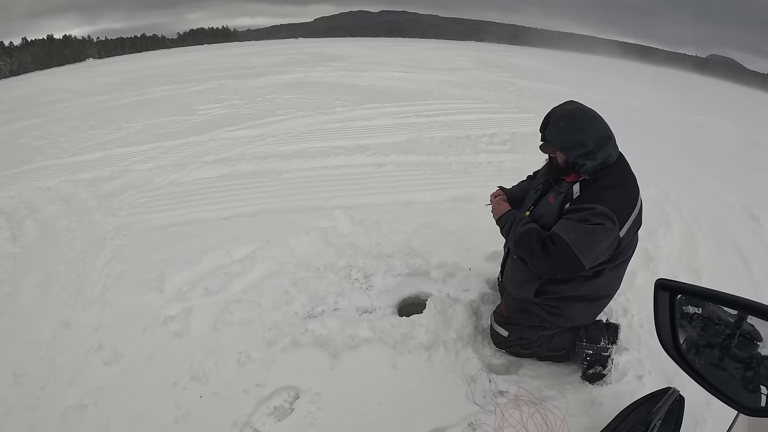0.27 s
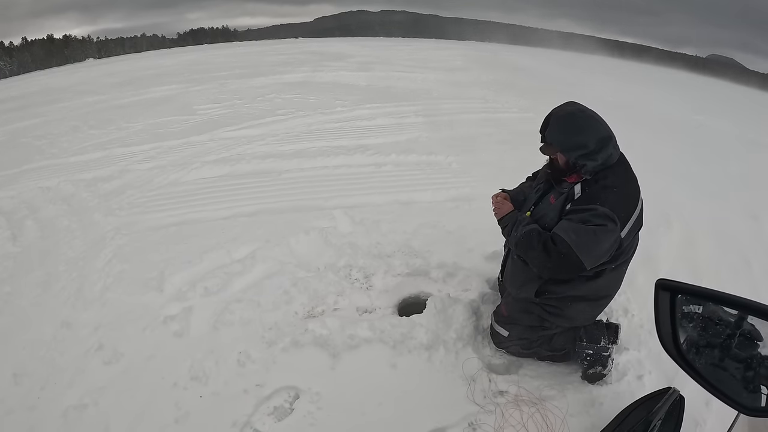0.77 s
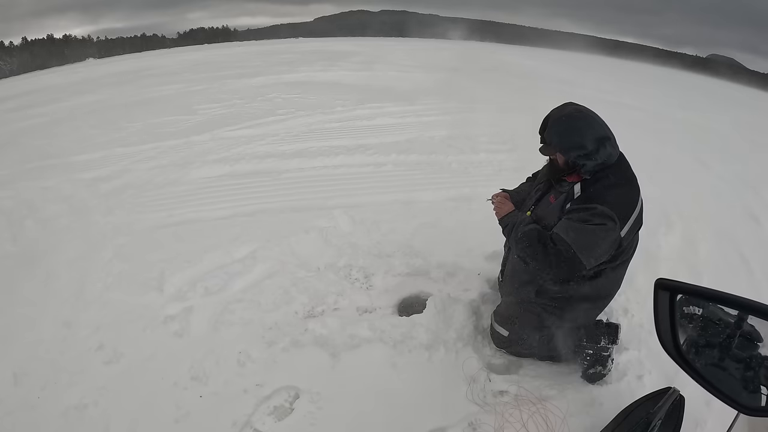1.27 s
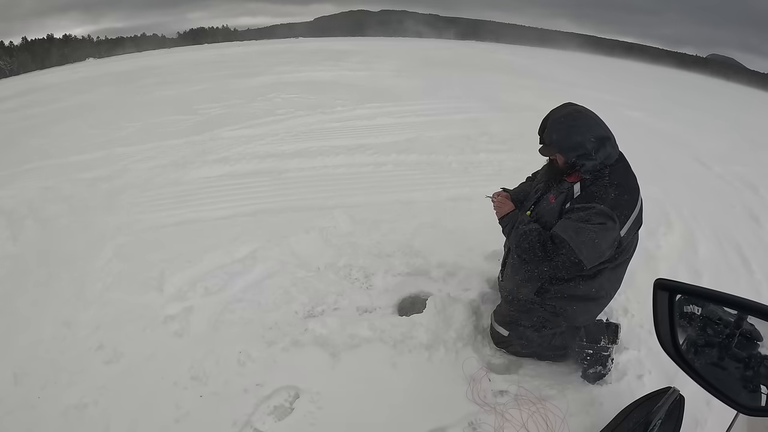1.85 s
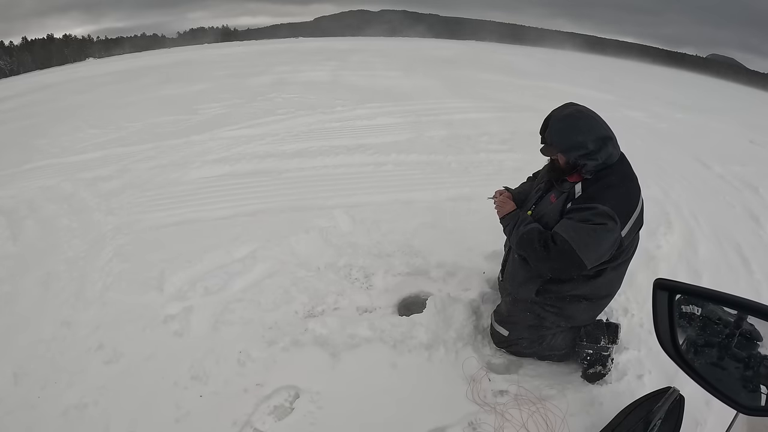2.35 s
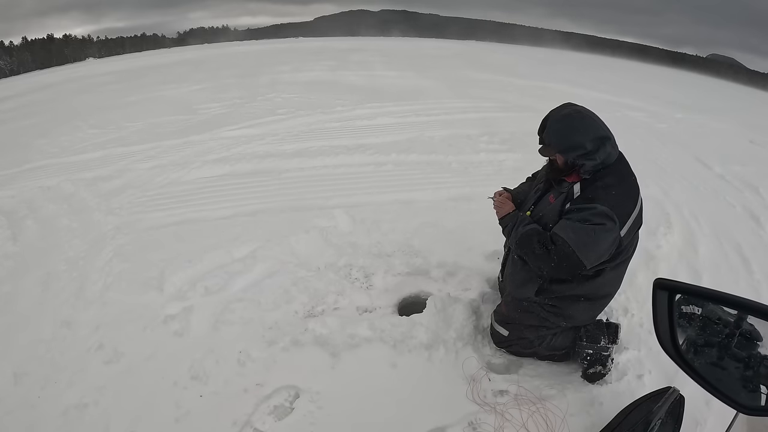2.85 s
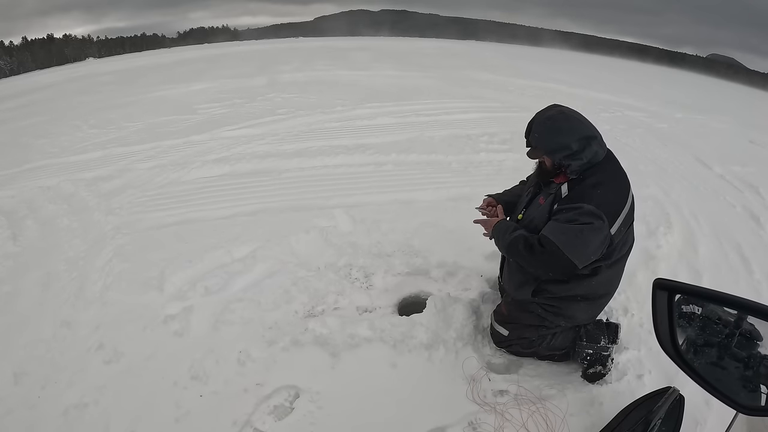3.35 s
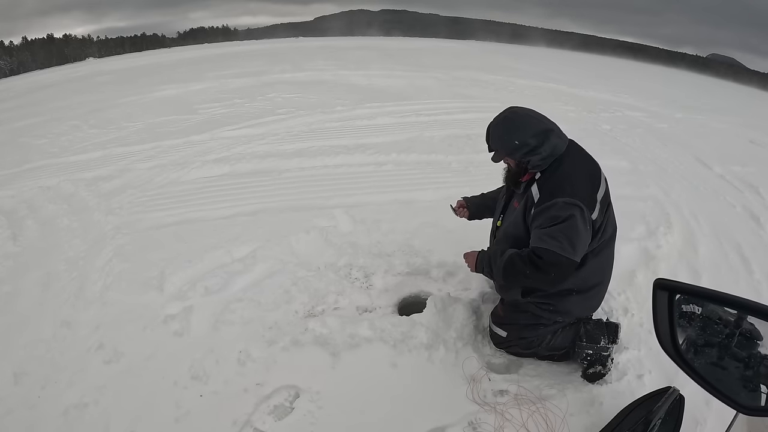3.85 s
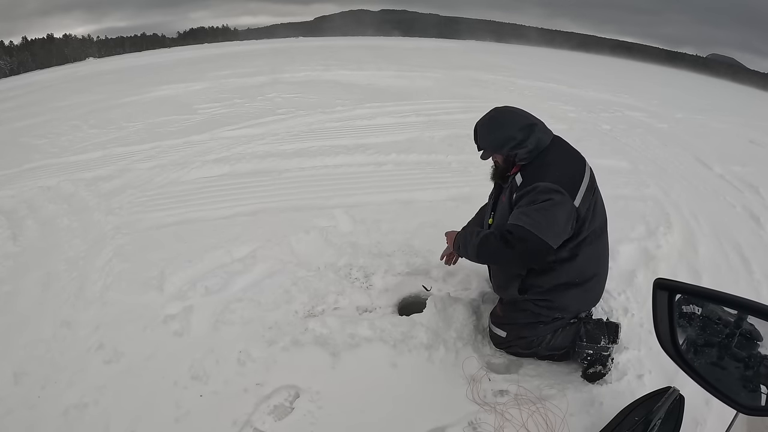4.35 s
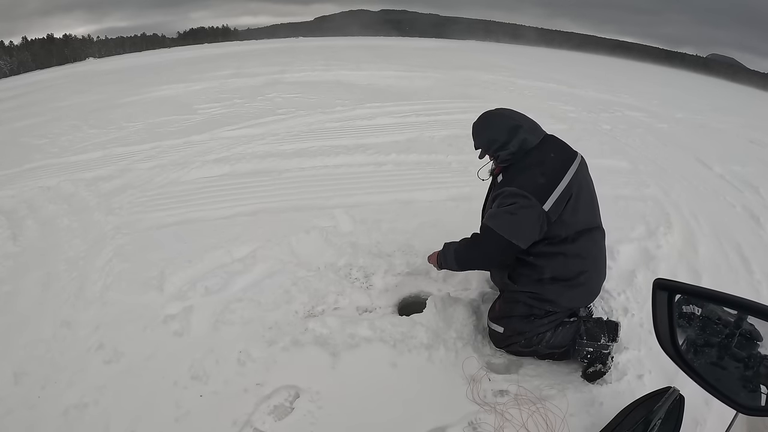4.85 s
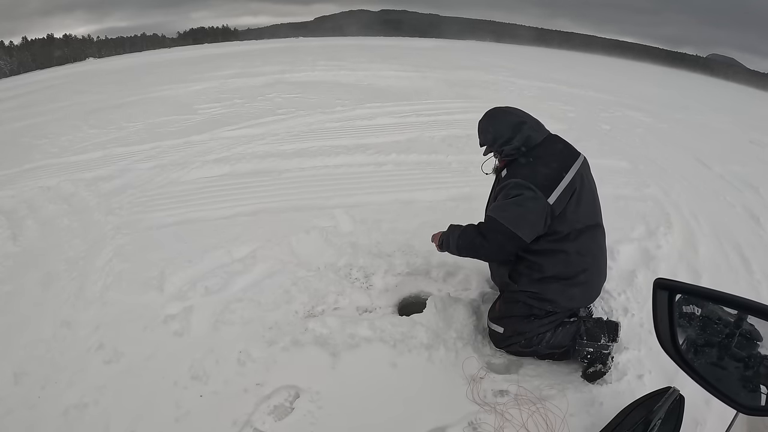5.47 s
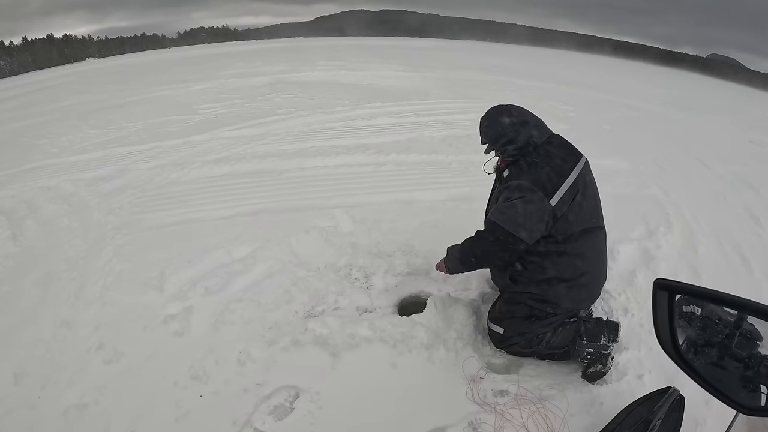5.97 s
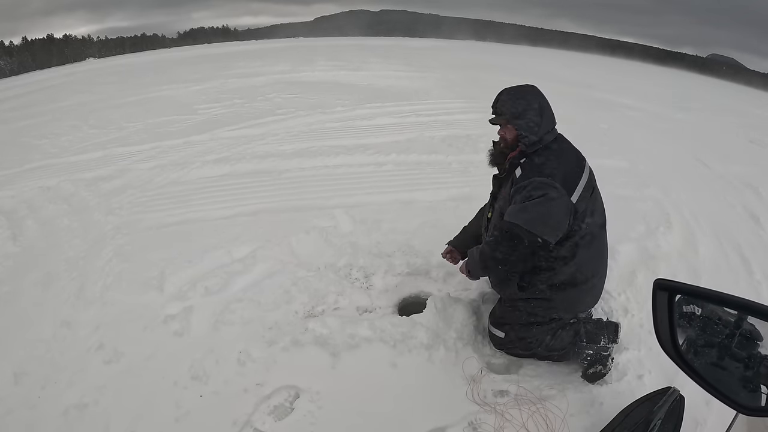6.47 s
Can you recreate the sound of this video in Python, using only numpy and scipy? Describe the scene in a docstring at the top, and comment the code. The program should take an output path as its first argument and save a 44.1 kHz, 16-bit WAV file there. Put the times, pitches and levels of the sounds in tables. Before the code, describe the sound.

A low, uneven roar of wind presses directly on the microphone out on a snowy frozen lake. It opens with the hardest, most hissing gust, settles slightly, and thumps harder again near the end. A thin sizzle of blowing snow sits above it. From about halfway, a few faint ticks like ice hitting the camera poke through, plus a very brief swish, perhaps a sleeve.

```python
"""A low, thumping roar: storm wind on a frozen lake blows straight over a small camera's microphone.
Turbulent eddies press on the port, roar round the housing and excite its hollow resonance.
Faster air adds a hiss, and the many small impacts of drifting snow merge into a fine sizzle.
A few faint ticks, likely ice grains hitting the housing, and one soft swish poke through."""
import sys
import numpy as np
from scipy import signal
from scipy.fft import rfft, irfft
from scipy.io import wavfile
from scipy.ndimage import uniform_filter1d

SR = 44100
rng = np.random.default_rng(int(sys.argv[2]) if len(sys.argv) > 2 else 0)


def store_wav(level_fs):
    """Save 16-bit WAV to argv[1]."""
    pcm = np.round(np.clip(np.atleast_2d(level_fs), -1, 1) * 32767)
    wavfile.write(sys.argv[1], SR, pcm.T.astype(np.int16))


N = 296352
TIME = np.arange(N) / SR

# The amount of drifting snow. Each row: time in seconds, relative level in dB.
DRIFT = [(0.0, -79), (0.13, -83), (0.33, -71.5), (1.05, -78), (1.32, -76), (1.8, -80), (3.2, -87.5),
         (3.9, -83.5), (5.25, -89.5), (6.08, -76), (6.72, -85)]


def wind():
    """Turbulence spans many scales: large eddies thump, smaller ones roar, the smallest hiss."""
    # Wind at the port. Each row: time in seconds, relative levels of buffeting and of roar in dB.
    port_levels = [(0.0, -29.5, -26.5), (0.45, -28, -25), (0.9, -33, -25), (1.25, -33, -27.5),
                   (1.7, -36, -28.5), (2.0, -39, -32.5), (2.35, -42.5, -30), (2.65, -33, -29.5),
                   (3.3, -35.5, -29), (3.55, -33, -29.5), (3.85, -37.5, -29), (4.25, -37.5, -31),
                   (5.345, -32.5, -29.8), (5.37, -31, -27), (5.6, -33, -28), (5.9, -30.5, -27),
                   (6.3, -34, -28.5), (6.72, -36, -31.5)]
    # The gusts. Each row: time in seconds, relative level of the rushing air in dB.
    gust_levels = [(0.0, -48.5), (0.12, -53.5), (0.16, -45.5), (0.185, -48), (0.22, -48), (0.255, -41),
                   (0.31, -43.5), (0.38, -40), (0.48, -40.5), (0.58, -43), (0.72, -42), (1.05, -46),
                   (1.37, -43), (1.55, -47.5), (1.75, -46.5), (1.97, -51), (2.35, -48.5), (2.52, -48.5),
                   (2.67, -45), (2.85, -48), (3.12, -51), (3.62, -51.5), (3.78, -48.5), (4.02, -49.5),
                   (4.17, -51.5), (4.75, -51), (5.12, -55), (5.345, -52), (5.37, -48.5), (5.52, -51),
                   (5.8, -48.5), (6.0, -49.5), (6.15, -51), (6.27, -49), (6.52, -49.5), (6.65, -52),
                   (6.72, -51.5)]
    buffet_db, flow_db = curves(port_levels)
    gust_db, = curves(gust_levels)
    eddy_thump, eddy_roar, eddy_ring, eddy_hiss = large_eddies()
    roar_drop_db, hiss_drop_db = lulls()
    lurch_hz = 22.14  # lesser eddies make the wind lurch at random
    roar_db = flow_db - roar_drop_db + 0.67 * walk(lurch_hz)
    flutter = walk(rate_hz=55)  # each passing eddy shakes all the bands together
    buffet_db = buffet_db - roar_drop_db + 1.66 * walk(lurch_hz)
    gust_db = gust_db - hiss_drop_db
    return (buffeting(add_power(buffet_db, eddy_thump), flutter)
            + roar(add_power(roar_db, eddy_roar), flutter)
            + housing_resonance(gust_db, roar_db, eddy_ring, flutter)
            + hiss(add_power(gust_db, eddy_hiss), flutter)
            + rumble(flow_db, roar_drop_db, flutter))


def buffeting(level_db, flutter):
    """Pseudo-sound: the slow pressure swings of large eddies act directly on the port."""
    # Spectrum of the buffeting. Each row: frequency in Hz, relative level in dB.
    spectrum = [(10, -28.5), (20, -10.5), (48, 1), (90, 3), (120, -3.5), (180, -9.5), (400, -74)]
    return turbulence(spectrum, 0.71 * flutter, span_s=0.067) * undb(level_db + 0.5)


def roar(level_db, flutter):
    """Flow round an obstacle: smaller eddies pass the housing faster and so sound higher."""
    # Spectrum of the roar. Each row: frequency in Hz, relative level in dB.
    spectrum = [(50, -27), (95, -5.5), (140, -0.5), (190, -1.5), (240, -1.5), (295, -2), (380, -5.5),
                (470, -13.5), (700, -43.5), (1500, -75)]
    return turbulence(spectrum, 1.54 * flutter, span_s=0.035) * undb(level_db - 0.41)


def rumble(flow_db, drop_db, flutter):
    """Nonlinear growth: above a knee, the low part of the roar rises twice as many dB as the flow."""
    # Spectrum of the rumble. Each row: frequency in Hz, relative level in dB.
    spectrum = [(60, -30), (110, -7), (165, -0.5), (215, -2), (280, -19.5), (600, -74.5)]
    knee_db = -31
    level_db = flow_db - drop_db - 11.5 + np.maximum(flow_db - knee_db, 0)
    return turbulence(spectrum, 1.2 * flutter, span_s=0.058) * undb(level_db)


def housing_resonance(gust_db, roar_db, eddy_ring, flutter):
    """Forced resonance: air speed and eddies together drive the hollow band of the housing."""
    # Response of the housing. Each row: frequency in Hz, relative level in dB.
    spectrum = [(250, -17), (440, 0.5), (485, -2.5), (520, 1.5), (620, -0.5), (740, -3), (860, -4),
                (930, -10), (1000, -13), (1250, -18.5), (1700, -32.5), (4000, -79.5)]
    gust_share = 0.65
    drive_db = gust_share * (gust_db + 15.5) + (1 - gust_share) * (roar_db - 8.0)
    return turbulence(spectrum, flutter, span_s=0.06) * undb(add_power(drive_db, eddy_ring))


def large_eddies():
    """A passing eddy is one pressure pulse; returns the gains of its thump, roar, ring and hiss."""
    # The largest eddies. Each row: time in seconds, relative peaks of thump, roar, ring and hiss in dB.
    eddies = [(0.09, -24, -45, -51, -71), (0.2, -23.5, -29, -34, -51), (0.27, -24, -35, -45, -45),
              (0.46, -22, -27, -27, -55), (0.66, -25, -32, -32, -47), (0.755, -33, -26, -30, -52),
              (0.87, -37, -35, -41, -60), (0.99, -27, -34, -45, -60), (1.08, -26, -28, -42, -45.5),
              (1.385, -33, -26, -29.5, -62), (1.73, -32, -26, -40, -62), (2.39, -46, -30, -48, -60),
              (2.694, -35, -24, -29.5, -52), (2.77, -35, -40, -31, -53), (3.459, -30, -26.5, -37, -55),
              (3.75, -46, -27, -44, -64), (3.88, -35, -29, -36, -60), (4.01, -33, -31, -36, -48),
              (4.35, -37, -27.5, -42, -65), (4.48, -28, -32, -41, -58), (4.84, -27.5, -30, -37, -67),
              (5.1, -44, -28, -47, -67), (5.265, -27.5, -30.5, -32, -57), (5.41, -38, -33, -35, -54),
              (5.6, -32, -37, -41, -50.5), (5.79, -30, -27, -39, -65), (5.88, -29, -28.5, -34, -65),
              (6.07, -40, -26.5, -37, -63), (6.24, -42, -42, -35, -47.5), (6.46, -24, -28, -36, -55)]
    rise_s, fall_s = 0.015, 0.018
    gains = np.zeros((4, N))
    for peak_s, *peaks_db in eddies:
        width_s = np.where(TIME < peak_s, rise_s, fall_s)
        gains += undb(peaks_db)[:, None] * bell(peak_s, width_s)
    return gains


def lulls():
    """Intermittency: the air goes slack between eddies; returns the drops of roar and hiss in dB."""
    # The lulls. Each row: middle and half-width in seconds, drops of the roar and of the hiss in dB.
    slack_moments = [(0.58, 0.017, 0.5, 0.5), (1.04, 0.021, 4.5, -0.5), (2.83, 0.026, 2, 1.5),
                     (3.13, 0.022, 2.5, 3.5), (3.31, 0.02, 5, 4), (3.58, 0.043, 0.5, 2),
                     (4.15, 0.041, 1.5, 0.5), (4.68, 0.022, 2.5, -0.5), (5.0, 0.035, 3, -1),
                     (5.15, .02, 2, 0.5), (5.22, 0.014, 1.5, 1.5), (5.325, 0.022, 5, 2),
                     (5.655, 0.027, 3.5, 1)]
    drops_db = np.zeros((2, N))
    for middle_s, width_s, *depths_db in slack_moments:
        drops_db += np.array(depths_db)[:, None] * bell(middle_s, width_s)
    return drops_db


def hiss(gust_db, flutter):
    """Fine-scale turbulence hisses; the more snow a gust carries, the brighter it sounds."""
    # Spectrum of the rushing air. Each row: frequency in Hz, relative level in dB.
    air_spectrum = [(500, -8.5), (1050, 2.5), (1600, 1.7), (2000, 0.5), (2800, -3), (4000, -12.5),
                    (5000, -21), (7000, -37), (9000, -63.5), (14000, -84)]
    # Spectrum of the snow spray. Each row: frequency in Hz, relative level in dB.
    spray_spectrum = [(1500, -16), (3200, 1.5), (4000, 0.5), (5000, -2), (6000, -8.5), (7100, -11.5),
                      (8500, -24.5), (9100, -48), (14000, -71)]
    flutter_db = 0.66 * flutter + 0.44 * walk(rate_hz=34)
    air = turbulence(air_spectrum, flutter_db, span_s=0.068) * undb(gust_db + 0.2)
    drift_db, = curves(DRIFT)
    snow_share, knee_db = 0.27, -49
    spray_db = (1 - snow_share) * (gust_db - 7.5) + snow_share * (drift_db + 18.5)
    spray_db += 0.19 * np.maximum(gust_db - knee_db, 0)  # strong gusts add extra spray
    spray = turbulence(spray_spectrum, flutter_db, span_s=0.35) * undb(spray_db)
    return air + spray


def snow():
    """Shot noise: countless tiny grains of uneven size arrive in flurries and merge into a sizzle."""
    # Spectrum of the sizzle. Each row: frequency in Hz, relative level in dB.
    spectrum = [(5000, -18.5), (7500, 0), (8600, -2), (9050, -4.5), (9500, -2), (10500, 0), (11700, 2.5),
                (12400, -4.5), (13300, -25.5)]
    drift_db, = curves(DRIFT)
    grains_per_s = 8000
    arrivals = rng.random(N) < grains_per_s / SR
    sizes = undb(1.8 * np.minimum(rng.exponential(size=N), 8))
    sizzle = colour(arrivals * sizes * rng.standard_normal(N), spectrum)
    flurry_db = 0.7 * walk(rate_hz=25)
    return sizzle * undb(drift_db + 3.0 + flurry_db)


def ticks():
    """Impulse response: a larger grain excites the housing's damped modes, in a band set by the contact."""
    # Grain impacts. Each row: start in seconds, peak level in dB, lower and upper band edges in Hz.
    impacts = [(2.969, -47, 5500, 9000), (2.9705, -54, 9800, 12500), (3.1695, -45, 3500, 6500),
               (3.2605, -33.5, 2900, 5000), (3.887, -52, 9800, 12500), (4.125, -52, 9500, 12500),
               (4.679, -57, 10500, 12500), (5.041, -48, 4500, 6500)]
    # Modes of the housing. Each row: frequency in Hz, relative level in dB, 60 dB decay time in seconds.
    modes = [(3400, -5, .002), (4300, -8, .002), (5900, -6, .002), (7200, -7, .002), (8400, -15, .002),
             (11500, -10, .002)]
    out = np.zeros(N)
    for start_s, peak_db, low_hz, high_hz in impacts:
        age = np.maximum(TIME - start_s, 0)
        ring = sum(undb(db - 60 * np.minimum(age / t60, 10)) * np.sin(2 * np.pi * hz * age)
                   for hz, db, t60 in modes)
        tick = colour(ring, [(low_hz / 2, -45), (low_hz, 0), (high_hz, -3), (high_hz * 2, -30)])
        out += undb(peak_db) * tick / np.abs(tick).max()
    return out


def swish():
    """Friction noise: one brief soft swish, likely a sleeve as the arm moves."""
    # Spectrum of the swish. Each row: frequency in Hz, relative level in dB.
    spectrum = [(1200, -8), (2500, 6), (4000, 2), (6800, -7), (8500, -18), (12000, -20), (14000, -38)]
    return colour(rng.standard_normal(N), spectrum) * bell(middle_s=4.939, width_s=0.0045) * undb(-53)


def turbulence(spectrum, flutter_db, span_s):
    """Amplitude-modulated noise, its mean power evened over span_s so the wind alone sets its swells."""
    noise = colour(rng.standard_normal(N) * undb(flutter_db), spectrum)
    power = smooth(noise ** 2, int(span_s * SR))
    return noise / np.sqrt(power + 1e-9)


def colour(x, spectrum):
    """Spectral shaping by an outline of (Hz, dB) points; the result has rms 1."""
    hz, db = np.transpose(spectrum)
    log_hz = np.log(np.maximum(np.arange(N // 2 + 1) * SR / N, 1))
    gain = undb(np.interp(log_hz, np.log(hz), db))
    return unit(irfft(rfft(x) * gain, N))


def walk(rate_hz):
    """Sample and hold: random levels drawn at rate_hz, then smoothed; the result has rms 1."""
    hold = int(SR / rate_hz)
    steps = np.repeat(rng.standard_normal(N // hold + 1), hold)
    return unit(smooth(steps, hold)[:N])


def smooth(x, samples):
    """Low-pass filtering by two moving averages."""
    return uniform_filter1d(uniform_filter1d(x, samples), samples)


def bell(middle_s, width_s):
    """A Gaussian pulse of height 1."""
    return np.exp(-.5 * ((TIME - middle_s) / width_s) ** 2)


def curves(table):
    """Linear interpolation of each level column over the times in the first."""
    times, *columns = np.transpose(table)
    return [np.interp(TIME, times, column) for column in columns]


def add_power(db, gain):
    """Incoherent sounds add in power: a level raised by an eddy's gain, in dB."""
    return 20 * np.log10(np.hypot(undb(db), gain))


def undb(db):
    """Decibels to amplitude gain."""
    return 10 ** (np.asarray(db) / 20)


def unit(x):
    """Normalisation to rms 1."""
    return x / np.sqrt(np.mean(x ** 2))


def scene():
    """Superposition: the pressures of all sources add at one microphone."""
    return (wind() + snow() + ticks() + swish())[None]


def record(dry):
    """Frequency response: the microphone has one narrow dip in the treble and a steep cut at the top."""
    notch_hz, notch_width_hz, top_hz = 9050, 460, 12700
    notch = signal.iirnotch(notch_hz, notch_hz / notch_width_hz, fs=SR)
    low_pass = signal.ellip(8, .2, 70, top_hz, fs=SR, output="sos")
    return signal.sosfilt(low_pass, signal.lfilter(*notch, dry))


dry = scene()
out = record(dry)
store_wav(out)
```